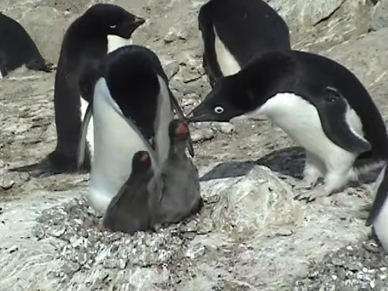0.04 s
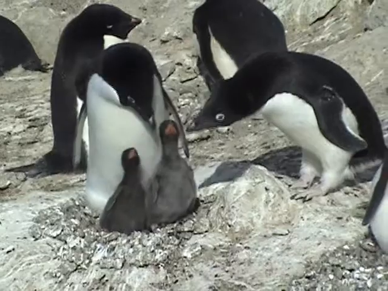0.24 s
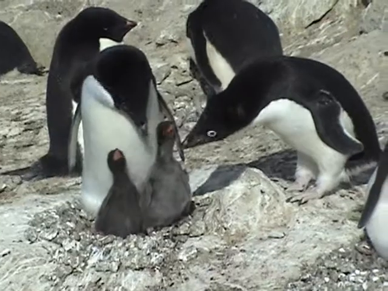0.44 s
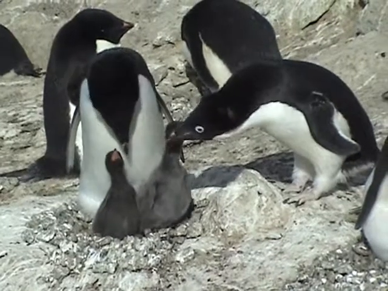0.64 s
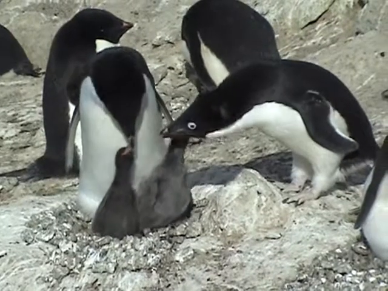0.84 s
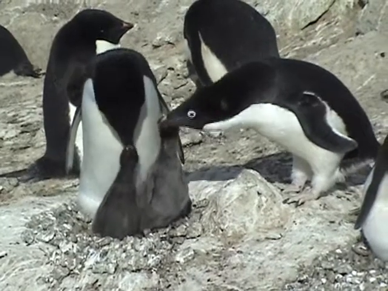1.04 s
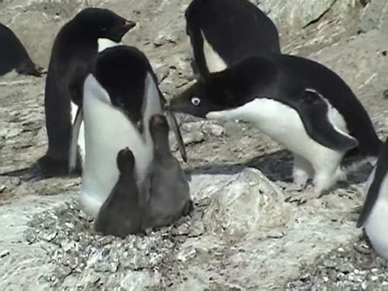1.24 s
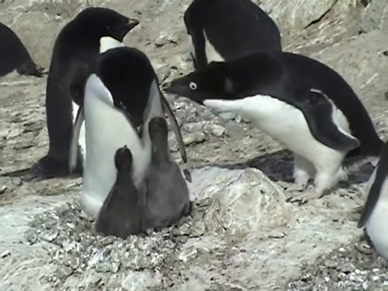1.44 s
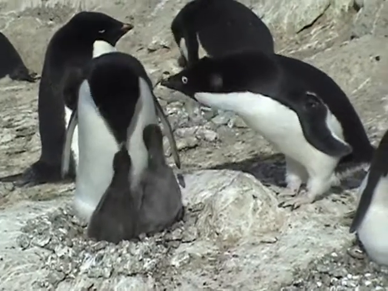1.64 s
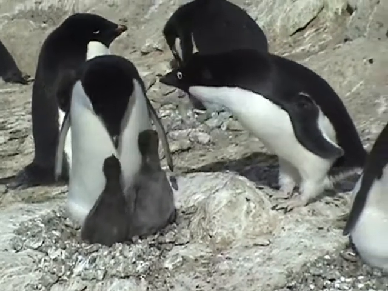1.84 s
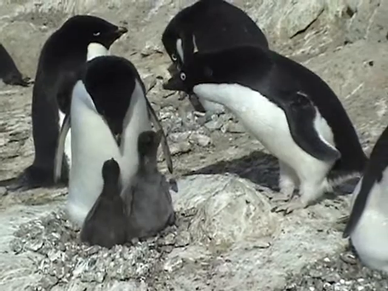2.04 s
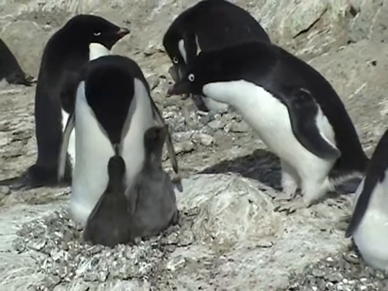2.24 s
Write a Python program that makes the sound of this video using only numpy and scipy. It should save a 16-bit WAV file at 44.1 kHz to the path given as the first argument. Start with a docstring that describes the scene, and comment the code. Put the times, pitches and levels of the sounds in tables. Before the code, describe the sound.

A nearby adult penguin gives harsh barks that run down into a rattling growl. Another further off answers with duller barks and growls. Chicks peep throughout, outdoors on open rock, over a faint colony and light wind.

```python
"""A near adult penguin barks harsh syllables that run down into a rattling growl, and grunts later:
uneven pulses from its syrinx ring in the throat and bill. A neighbour further off opens with a breathy
rasp and answers in kind, with short dry scratches between its barks.
Chicks whistle with both sides of the syrinx, so their tones beat and cross. Open rock adds a short echo.
Underneath lie the distant colony and a little wind on the microphone."""
import sys
import numpy as np
from scipy import signal
from scipy.fft import rfft, irfft, next_fast_len
from scipy.io import wavfile
from scipy.ndimage import uniform_filter1d, map_coordinates

SR = 44100
rng = np.random.default_rng(int(sys.argv[2]) if len(sys.argv) > 2 else 0)


def store_pcm(level_fs):
    """Save levels as 16-bit WAV."""
    pcm = np.round(np.clip(level_fs, -1, 1) * 32767).astype(np.int16)
    wavfile.write(sys.argv[1], SR, np.atleast_2d(pcm).T)


N = 105840

# The near adult's syllables: start_s, length_s, level_db, start_pitch_hz, end_pitch_hz, jitter_periods
NEAR_BARKS = [(.228, 0.07, -25, 265.2, 264.6, 0.084), (.340, 0.069, -25.5, 284, 246.3, 0.11),
              (.450, .07, -26, 266.3, 205.1, 0.15), (.555, 0.081, -25.5, 288.5, 237.2, 0.099)]
NEAR_GROWLS = [(.656, 0.035, -26, 258.3, 227.8, 0.082), (.692, 0.074, -31.5, 189.9, 134.6, 0.119),
               (.767, 0.096, -30.5, 196.1, 168.3, 0.082), (.866, 0.065, -31.5, 180.7, 158.7, 0.065),
               (.936, 0.05, -35.5, 135.6, 108.5, 0.066)]
NEAR_GRUNTS = [(1.688, 0.057, -35.5, 126.3, 166.8, 0.12), (1.732, 0.054, -35.5, 175.4, 163.5, 0.075),
               (1.845, 0.056, -40, 129.7, 109.3, 0.22)]
# Throat and bill resonances for each kind of call: frequency_hz, gain_db
BARK_FORMANTS = [(90, -20), (185, 8), (260, 0.5), (400, -1.5), (1500, -1), (2000, 3), (2450, -3.5),
                 (3100, -16.5), (4000, -10.5), (6500, -7), (7500, -15.5), (8800, -13.5), (10500, -25),
                 (15500, -32)]
GROWL_FORMANTS = [(90, -26), (185, 7.5), (420, -2.5), (660, 1.5), (1250, -6), (1790, 5), (2080, -7.5),
                  (3400, -10.5), (3800, -8), (4300, -15.5), (5650, -2.5), (6250, -13), (6900, -9),
                  (9500, -21.5), (15500, -32)]
GRUNT_FORMANTS = [(90, -28), (165, 11), (680, -0.5), (950, -11.5), (1220, -1), (1850, -0.5), (2200, -12.5),
                  (3200, -23.5), (3900, -7.5), (4400, -26), (5600, -8.5), (15000, -40.5)]


def near_adult():
    """Open-billed barks, a slowing rattle as the bill closes, and short grunts later."""
    barks = bray(NEAR_BARKS, BARK_FORMANTS, attack_s=0.0058, release_s=0.0033, uneven_db=4.0,
                 rasp=1.25, rasp_s=0.0034, rasp_hz=550, sag_db=-4.5, body=1.35, sink_per_s=0.11)
    growls = bray(NEAR_GROWLS, GROWL_FORMANTS, attack_s=0.0021, release_s=0.0033, uneven_db=3.5,
                  rasp=1.22, rasp_s=0.0022, rasp_hz=400, sag_db=-2.0, limp_db=3.0)
    grunts = bray(NEAR_GRUNTS, GRUNT_FORMANTS, attack_s=0.002, release_s=0.0067, uneven_db=2.5,
                  rasp=1.76, rasp_s=0.003, rasp_hz=510)
    return barks + growls + grunts


def bray(syllables, formants, attack_s, release_s, uneven_db, rasp, rasp_s, rasp_hz,
         sag_db=0, limp_db=0, arch=0, body=0, sink_per_s=0):
    """Uneven syrinx pulses over a clear low tone, each trailed by a puff of rasp, ring in the throat."""
    t, out = clock(), np.zeros(N)
    puff = np.exp(-t[:SR // 20] / rasp_s)
    low_cut = signal.butter(2, rasp_hz, 'high', fs=SR, output='sos')
    for start, length, db, start_hz, end_hz, jitter in syllables:
        timing, accent = rng.standard_normal((128, 2)).T
        progress = np.clip((t - start) / length, 0, 1)
        attack = np.clip((t - start) / attack_s, 0, 1)
        envelope = attack * np.exp(-np.maximum(t - start - length, 0) / release_s)
        pitch = (start_hz + (end_hz - start_hz) * progress) * (1 + arch * np.sin(np.pi * progress))
        cycles = np.cumsum(pitch * (t >= start)) / SR
        count = min(int(np.interp(start + length + 2 * release_s, t, cycles)) + 1, len(timing))
        k = np.arange(count)  # one pulse per cycle
        onsets = np.interp(k + .5 + jitter * timing[k], cycles, np.arange(N)).astype(int)
        pulse_db = uneven_db * np.tanh(accent[k]) - limp_db * (k % 2)  # limp ducks every other pulse
        pulses = np.bincount(onsets, amp(pulse_db), N)
        phase = 2 * np.pi * cycles
        tone = body * envelope * pitch / SR * (.5 * np.cos(2 * phase) - np.cos(phase))
        air = signal.sosfilt(low_cut, signal.fftconvolve(pulses, puff)[:N] * rng.standard_normal(N))
        source = unit(disperse(pulses + tone)) + rasp * unit(air)
        closing = np.exp(-sink_per_s * (start - syllables[0][0]))  # formants sink as the bill closes
        voice = equalise(source, np.array(formants) * [closing, 1])
        voice /= np.sqrt(np.mean(voice[(t > start) & (t < start + length)] ** 2))
        out += voice * envelope * amp(db + sag_db * progress)
    return out


def disperse(x, low_delay_s=0.000893):
    """All-pass dispersion: the lows leave after the treble, so a pulse becomes a short ringing burst."""
    size = next_fast_len(N + SR // 2)
    delay_s = low_delay_s * np.exp(-np.fft.rfftfreq(size, 1 / SR) / 5000)
    phase_lag = 2 * np.pi * np.cumsum(delay_s) * SR / size
    return irfft(rfft(x, size) * np.exp(-1j * phase_lag), size)[:N]


# The neighbour's syllables, before pitch arch and EQ:
# start_s, length_s, level_db, start_pitch_hz, end_pitch_hz, jitter_periods
NEIGHBOUR_BARKS = [(1.128, 0.073, -40.5, 353, 325, 0.084), (1.256, 0.066, -38.5, 351.4, 305, 0.046),
                   (1.376, 0.079, -39, 374.6, 346.7, 0.03), (1.495, 0.074, -38, 398.2, 293, 0.026),
                   (1.607, 0.075, -40, 351.5, 315.3, 0.02), (1.815, 0.068, -40.5, 353.2, 275, 0.073)]
NEIGHBOUR_GROWLS = [(1.015, 0.058, -40, 326.8, 383, 0.14), (1.955, 0.12, -38.5, 287.7, 265.9, 0.051),
                    (2.09, .13, -44, 293.4, 264.5, 0.081), (2.25, .14, -45, 313.5, 255, 0.063)]
# Its throat and bill resonances: frequency_hz, gain_db
NEIGHBOUR_FORMANTS = [(140, -11), (370, -1.5), (560, -1.5), (735, 2.5), (860, -4.5), (1300, -6), (1590, 4),
                      (2250, -18), (3800, -17), (15000, -46)]


def neighbour():
    """The same display further off and duller: a hoarse opening, arching nasal barks, a closing growl."""
    barks = bray(NEIGHBOUR_BARKS, NEIGHBOUR_FORMANTS, attack_s=0.0039, release_s=0.0057, uneven_db=5.5,
                 rasp=0.6, rasp_s=0.00093, rasp_hz=1000, sag_db=-4, arch=0.12, body=1.63)
    growls = bray(NEIGHBOUR_GROWLS, NEIGHBOUR_FORMANTS, attack_s=0.0024, release_s=0.0094, uneven_db=6,
                  rasp=0.42, rasp_s=0.0025, rasp_hz=500, sag_db=-3.5, body=1.95)
    return disperse(barks + equalise(growls, [(600, -1.0), (800, -4)]))


# Chick whistles, one gliding tone per table, before the bus gain: time_s, pitch_hz, level_db
FIRST_PEEP = [(0.478, 4022, -34), (0.565, 4258, -36), (0.605, 4144, -35), (0.635, 3890, -34.5),
              (0.668, 3580, -47), (0.712, 3550, -44)]
FIRST_PEEP_UPPER = [(0.498, 4263, -50), (0.565, 4350, -38.5), (0.67, 4026, -44)]
SECOND_PEEP = [(1.066, 3893, -51), (1.091, 4410, -41.5), (1.145, 4580, -33.5), (1.196, 4170, -42),
               (1.29, 4120, -39.5), (1.316, 3835, -49)]
SECOND_PEEP_UPPER = [(1.101, 4826, -47), (1.156, 4810, -46), (1.176, 4990, -36), (1.19, 4560, -35),
                     (1.245, 3960, -39.5), (1.314, 3550.0, -53.5)]
SECOND_PEEP_LOWER = [(1.175, 3390, -48.5), (1.228, 3250, -53.5)]
THIRD_PEEP = [(1.733, 4590, -65), (1.766, 5073, -40.5), (1.832, 4910, -39), (1.882, 4125, -44),
              (1.907, 3874, -47), (1.938, 3985, -46.5), (1.968, 3840, -61)]
THIRD_PEEP_UPPER = [(1.79, 5770, -46), (1.83, 5520.0, -61), (1.907, 4286, -51), (1.935, 4570, -48),
                    (1.982, 3710, -54)]
CHICK_WHIMPER = [(2.025, 3520, -55.5), (2.1, 3255, -56), (2.146, 3135, -75), (2.195, 3830, -58),
                 (2.236, 3290, -68)]
# Whistles on the same bus whose octave leads on some low notes: time_s, pitch_hz, level_db, octave_db
CHICK_WARBLE = [(0.197, 3946, -54, -43.5), (0.233, 3600, -50.5, -45), (0.25, 4535, -41, -59),
                (0.277, 4840, -32, -38.5), (0.298, 4370, -35, -51), (0.315, 3904, -56, -39),
                (0.335, 3730, -41.5, -62), (0.353, 4620, -41, -47), (0.368, 4760, -31, -40),
                (0.386, 4500, -36, -73), (0.402, 3960, -63, -36.5), (0.425, 3730, -41, -59),
                (0.443, 3830, -55, -47), (0.464, 4670, -36, -63)]
CHICK_CRY = [(1.166, 3760, -48, -65), (1.195, 4690, -39.5, -50), (1.27, 4440, -41, -53),
             (1.311, 3880, -58, -50), (1.342, 3600, -56, -49.5)]
# The chicks' breathy hiss: frequency_hz, gain_db
BREATH_EQ = [(2500, -12), (4200, -5), (6000, -6), (8700, -3), (10400, -18), (12200, -1.5), (14500, -13)]


def chicks(bus_db=4.0, hiss_db=-18.5):
    """Begging whistles beat where they overlap, and a breathy hiss follows their envelope."""
    glides = [CHICK_WARBLE, FIRST_PEEP, FIRST_PEEP_UPPER, SECOND_PEEP, SECOND_PEEP_UPPER, CHICK_CRY,
              SECOND_PEEP_LOWER, THIRD_PEEP, THIRD_PEEP_UPPER, CHICK_WHIMPER]
    song = amp(bus_db) * sum(whistle(glide) for glide in glides)
    envelope = uniform_filter1d(np.abs(song), size=200)
    breath = unit(equalise(rng.standard_normal(N), BREATH_EQ))
    return song + amp(hiss_db) * envelope * breath


def whistle(glide, flutter=0.00374, shimmer_db=1.12, roughness_rad=0.13, fade_s=0.0084):
    """One side of a chick's syrinx: a gliding sine with raspy overtones."""
    t = clock()
    times, hz, db, *own_octave = np.transpose(glide)
    octave_db = own_octave[0] if own_octave else db - 17.5
    pitch = uniform_filter1d(np.interp(t, times, hz), size=350) * (1 + flutter * wobble(900))
    phase = 2 * np.pi * np.cumsum(pitch) / SR
    fundamental = amp(np.interp(t, times, db)) * np.sin(phase)
    rough_phase = phase + roughness_rad * wobble(1100)
    third = amp(-16.5) * np.sin(3 * rough_phase)
    fourth = amp(-22) * np.sin(4 * rough_phase) * (4 * pitch < SR / 2)  # muted where it would alias
    overtones = amp(np.interp(t, times, octave_db)) * (np.sin(2 * rough_phase) + third + fourth)
    gate = np.clip(np.minimum(t - times[0], times[-1] - t) / fade_s + 1, 0, 1)
    return gate * amp(shimmer_db * wobble(140)) * (fundamental + overtones)


# The breathy rasp of the neighbour's opening note, then short dry scratches between its barks:
# start_s, length_s, level_db, centre_hz
RASP_AND_SCRATCHES = [(1.013, 0.033, -44, 3270), (1.303, 0.024, -47, 4770), (1.44, 0.026, -53, 4900),
                      (1.565, 0.025, -49, 4700)]


def rasp_and_scratches(edge_ratio=1.35, grit_db=5.8):
    """The neighbour's opening rasp, then dry scratches: bands of gritty noise under a quick swell."""
    t, out = clock(), np.zeros(N)
    for start, length, db, hz in RASP_AND_SCRATCHES:
        band = signal.butter(2, [hz / edge_ratio, hz * edge_ratio], 'band', fs=SR, output='sos')
        grit = unit(signal.sosfilt(band, rng.standard_normal(N)) * amp(grit_db * wobble(500)))
        progress = np.clip((t - start) / length, 0, 1)
        swell = np.sqrt(np.abs(np.sin(np.pi * progress)))
        out += amp(db) * grit * swell
    return out


# The wash of distant birds: frequency_hz, gain_db
COLONY_EQ = [(100, -9.5), (350, -2), (1550, -9.5), (2400, -17), (4000, -17), (15000, -41)]


def far_colony(level_db=-46.5, waver_db=1.0, lull_start_s=2.19, lull_db_per_s=-16.5):
    """Distant birds blur into a wavering bed of noise that dies down at the end."""
    lull_db = lull_db_per_s * np.maximum(clock() - lull_start_s, 0)
    return stereo_noise(COLONY_EQ, side_db=-10) * amp(level_db + lull_db + waver_db * wobble(14.25))


# The envelope of two gusts: time_s, level_db
GUSTS = [(.29, -42.5), (.48, -77), (1.038, -63.5), (1.261, -44), (1.45, -74)]
# Their low rumble: frequency_hz, gain_db
WIND_EQ = [(20, -4.5), (110, -0.5), (1000, -76)]


def wind(buffet_db=3.8):
    """Wind pushes the two microphone ports against each other, making a wide, unsteady rumble."""
    gust_db = np.interp(clock(), *np.transpose(GUSTS))
    return stereo_noise(WIND_EQ, side_db=6) * amp(gust_db + buffet_db * wobble(18))


def rock_echo(x, rt60_s=0.098, predelay_s=0.003):
    """A short scattered answer from the stony ground, different in each ear."""
    t = clock()[:SR // 2]
    tail = rng.standard_normal((2, len(t))) * amp(-60 * t / rt60_s) * (t > predelay_s)
    mid, side = tail / np.linalg.norm(tail[0])
    response = np.array([mid + 0.1 * side, mid - 0.67 * side])
    return signal.fftconvolve(x[None], response, axes=1)[:, :N]


def stereo_noise(curve, side_db):
    """Equalised mid/side noise whose mid has an rms near 1."""
    mid, side = unit(equalise(rng.standard_normal((2, N)), curve)) * amp([[0], [side_db]])
    return np.array([mid + side, mid - side])


def equalise(x, curve):
    """Minimum-phase EQ through (frequency_hz, gain_db) points."""
    size = 2 * next_fast_len(N // 2 + 8192)
    hz, db = np.transpose(curve)
    gain = amp(np.interp(np.log(np.fft.rfftfreq(size, 1 / SR) + 1), np.log(hz), db))
    cepstrum = irfft(np.log(gain), size)
    cepstrum[1:size // 2] *= 2  # folded forward, so ringing only follows a pulse
    cepstrum[size // 2 + 1:] = 0
    return irfft(rfft(x, size) * np.exp(rfft(cepstrum)), size)[..., :N]


def wobble(rate_hz):
    """Smooth random modulation with rate_hz knots a second."""
    return map_coordinates(rng.standard_normal(int(N * rate_hz / SR) + 4), [clock() * rate_hz])


def amp(db):
    """Decibels to gain."""
    return 10 ** (np.asarray(db) / 20)


def unit(x):
    """Scale to rms 1."""
    return x / np.sqrt(np.mean(x ** 2) + 1e-20)


def clock():
    """Time of every sample in seconds."""
    return np.arange(N) / SR


def scene(echo_db=-11, pan_db=0.49):
    """The birds stand nearly straight ahead, over the far colony and the wind."""
    birds = near_adult() + neighbour() + chicks() + rasp_and_scratches()
    pan = amp([[-pan_db], [pan_db]])
    return (birds + amp(echo_db) * rock_echo(birds)) * pan + far_colony() + wind()


def record(dry, start_s=0.1882, fade_s=0.02, high_cut_hz=16000):
    """The mix fades in quickly after a moment of silence and passes a brick-wall high cut."""
    faded = dry * np.clip((clock() - start_s) / fade_s, 0, 1)
    size = next_fast_len(N + SR // 2)
    passband = np.fft.rfftfreq(size, 1 / SR) < high_cut_hz
    return irfft(rfft(faded, size) * passband, size)[:, :N]


dry = scene()
out = record(dry)
store_pcm(out)
```